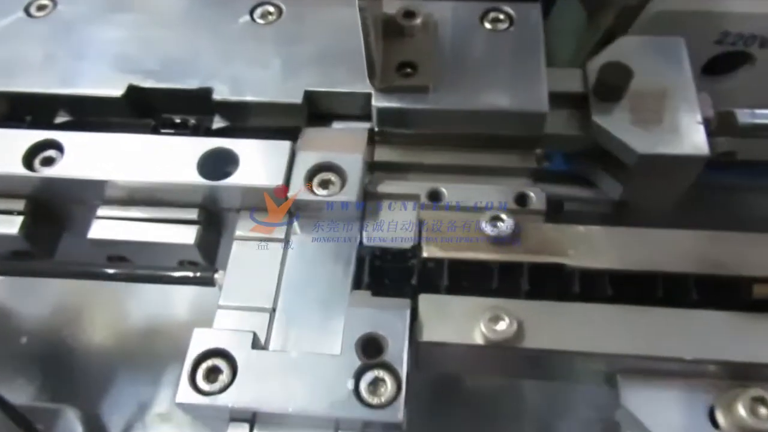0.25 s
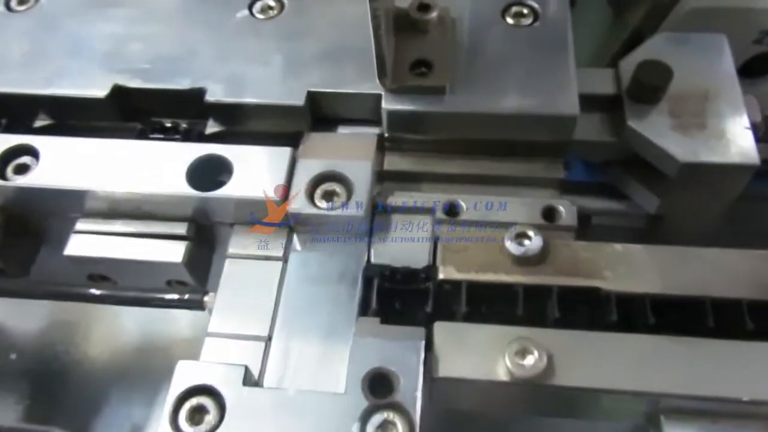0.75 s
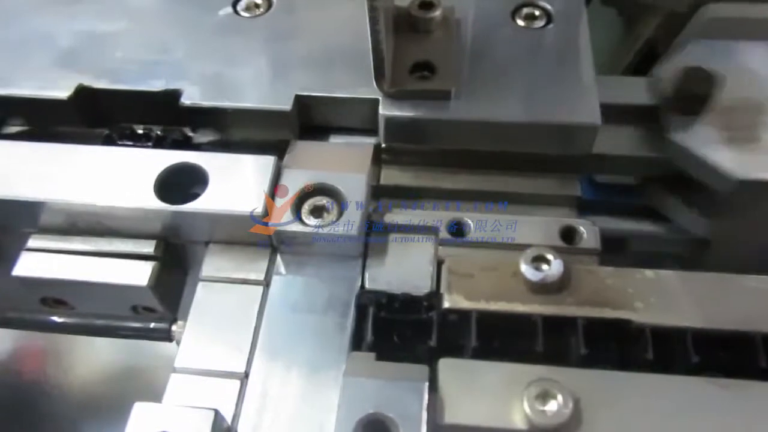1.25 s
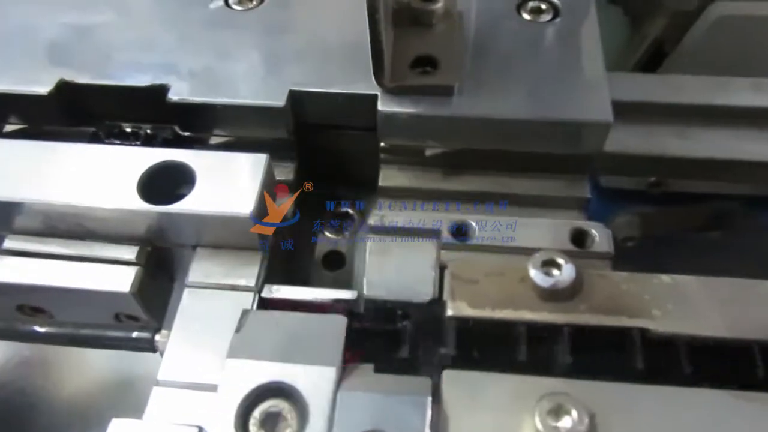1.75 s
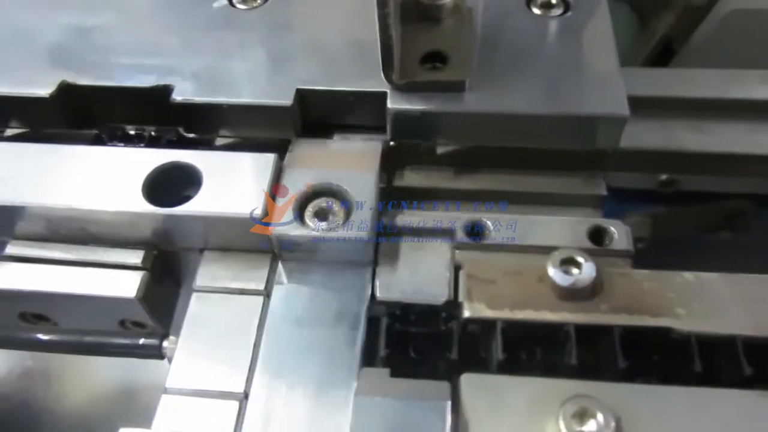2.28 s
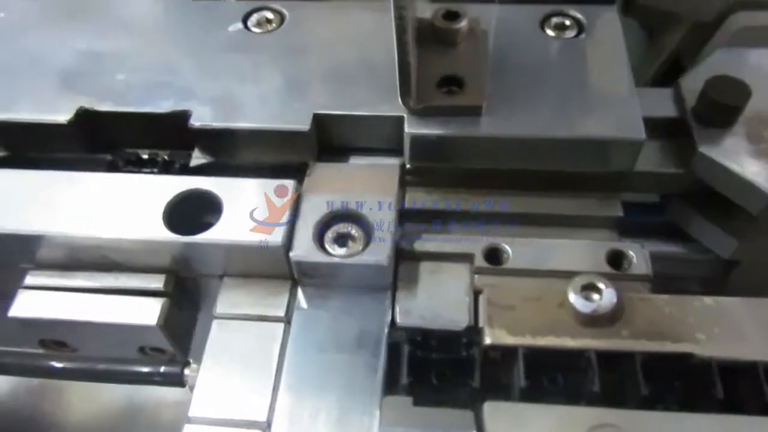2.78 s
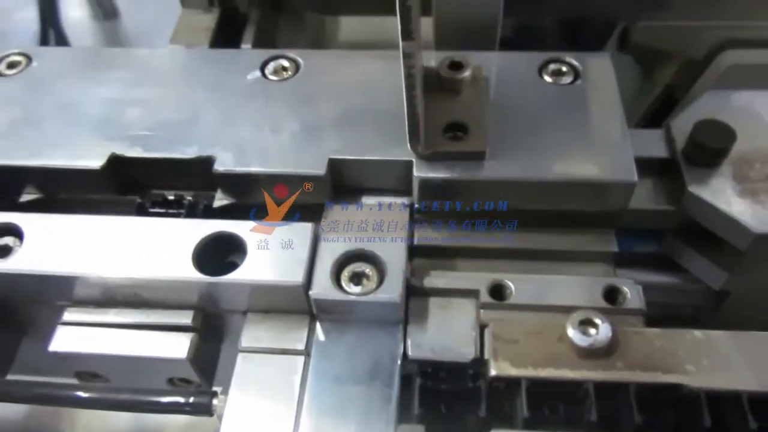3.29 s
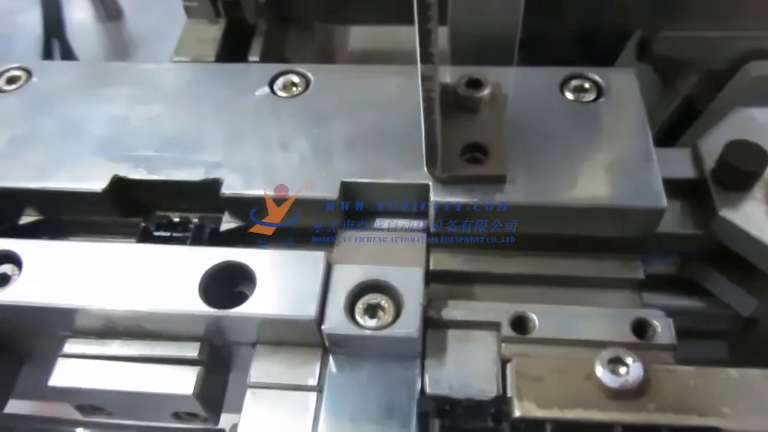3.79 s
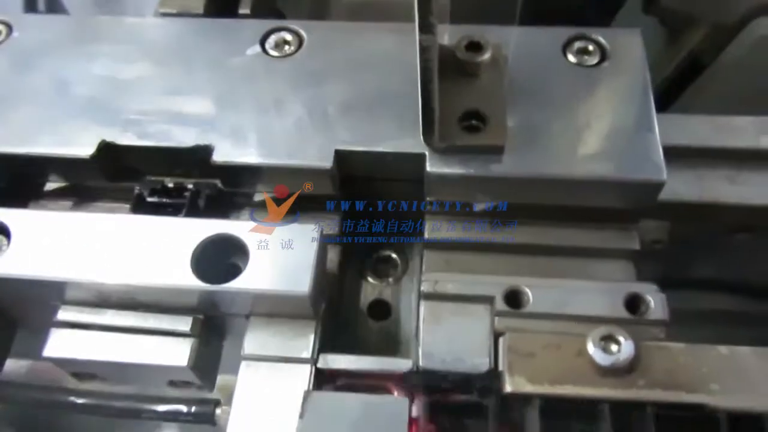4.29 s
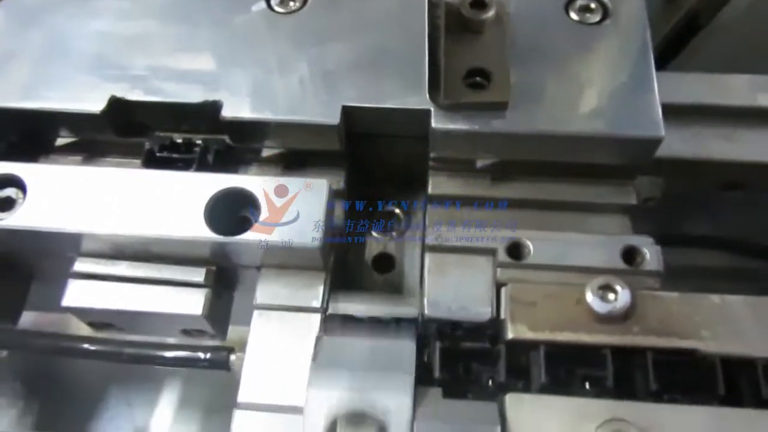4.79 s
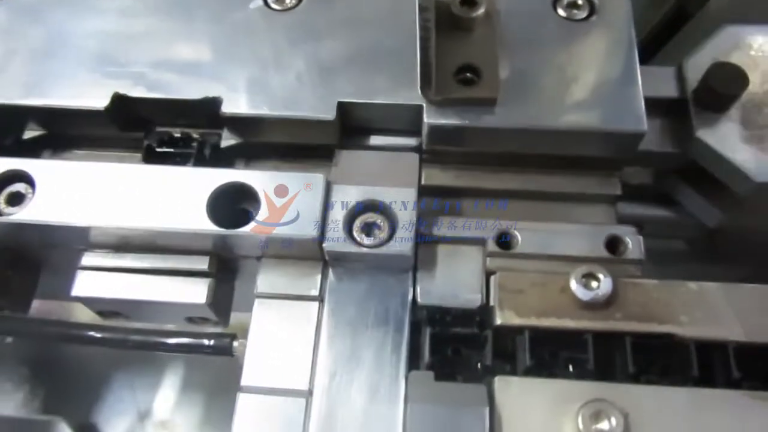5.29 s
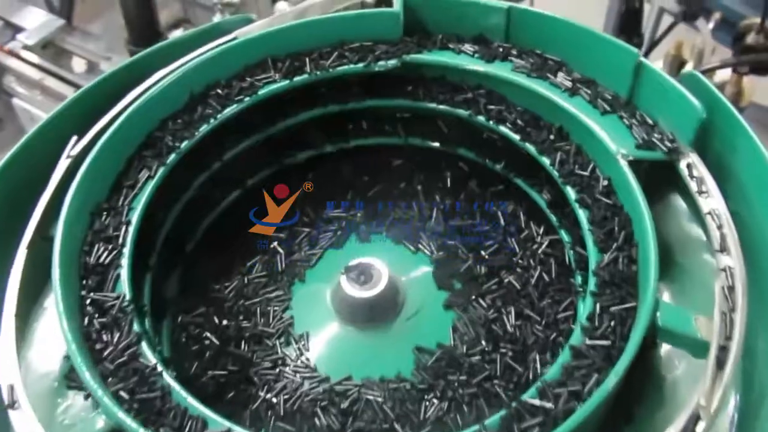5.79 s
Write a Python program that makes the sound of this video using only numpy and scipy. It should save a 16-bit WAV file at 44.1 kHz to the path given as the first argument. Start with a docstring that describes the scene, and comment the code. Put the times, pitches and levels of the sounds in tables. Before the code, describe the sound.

An automatic assembly machine runs close to the microphone in a factory hall. Throughout, small pins shaking in a vibrating feeder make a bright, buzzing sizzle with tiny ticks, over hissing air, electrical hum and the roar of distant machines. Irregular metallic knocks from neighbouring stations fill the first second. At about 1.3 seconds a valve puffs, and at 1.55 a steel slide clacks and bounces against its stop, with further clacks near 1.8 and 2.4. More knocks follow from 2.8 to 3.5. A second puff at 3.9 leads to the hardest clack at 4.15, then others near 4.4 and 5.0. After both main strokes the hiss and roar dip briefly and recover. The hits have a short echo. At about 5.6 seconds the feeder bowl's low drone comes in abruptly over the running machine, with quick knocks until the end at around 6 seconds.

```python
"""A factory hall, microphone close to an automatic assembly machine. Twice, 2.6 s apart, a valve puffs and
a pneumatic steel slide clacks against its stops; hiss, ringing and hall roar dip briefly, then recover.
Nearby stations knock through the frame. A vibrating feeder shakes small pins about a hundred times
a second, a bright buzzing sizzle over leaking air, mains hum and the roar of far machines.
Near the end the sound switches abruptly to the feeder bowl's drone, over the running machine."""
import sys
import numpy as np
from scipy import signal
from scipy.fft import rfft, irfft, next_fast_len
from scipy.io import wavfile
from scipy.ndimage import uniform_filter1d, map_coordinates

SR = 44100
rng = np.random.default_rng(int(sys.argv[2]) if len(sys.argv) > 2 else 0)


def materialize(psi):
    """Save the field psi as 16-bit PCM at rate SR to the path in sys.argv[1].

    A 1-D psi becomes a single channel; in a 2-D psi each row is a channel.
    """
    bounded = np.clip(np.atleast_2d(psi).T, -1, 1)
    quanta = np.round(bounded * 32767).astype(np.int16)
    wavfile.write(sys.argv[1], SR, quanta)


N = 266805
FEEDER_HZ = 103.2
# resonances of the steel feed rails: (frequency [Hz], width [Hz], gain [dB])
RAIL_MODES = [(1263, 59, -6), (1520, 143, -7), (1954, 93, -6), (2450, 70, -1), (3290, 400, -2.5),
              (3497, 170, 1), (3703, 140, 1.5), (4077, 89, 1.5), (4320, 150, -5.5), (4860, 144, -2.5),
              (5330, 160, -5), (5880, 150, -2), (6640, 150, -1.5), (7310, 86, -1.5)]


def amp(db):
    """Decibels to gain."""
    return 10 ** (np.asarray(db) / 20)


def unit(x):
    """Scaled to rms 1."""
    return x / np.sqrt(np.mean(x ** 2) + 1e-20)


def along(points, hz):
    """Read (frequency, value) points on a log axis."""
    freqs, values = np.transpose(points)
    return np.interp(np.log(hz + 1), np.log(freqs + 1), values)


def curves(rows):
    """One value per sample for each column after the time."""
    times, *columns = np.transpose(rows)
    return [np.interp(np.arange(N) / SR, times, column) for column in columns]


def wobble(rate):
    """A smooth random curve, rate knots a second."""
    return map_coordinates(rng.standard_normal(int(N * rate / SR) + 4), [np.arange(N) * rate / SR])


def filtered(x, response):
    """x through a complex response of frequency."""
    n = x.shape[-1]
    padded = next_fast_len(n + SR // 8)
    return irfft(rfft(x, padded) * response(np.fft.rfftfreq(padded, 1 / SR)), padded)[..., :n]


def colour(points):
    """The response of a spectrum given in dB."""
    return lambda hz: amp(along(points, hz))


def body(modes):
    """The response of a set of resonances, alternating in sign."""
    return lambda hz: sum((-1) ** k * amp(db) * 1j * hz * width / (centre**2 - hz**2 + 1j * hz * width)
                          for k, (centre, width, db) in enumerate(modes))


def noise(response, size=N):
    """Two unrelated coloured noises of rms 1."""
    return unit(filtered(rng.standard_normal((2, size)), response))


def add(track, s, sound):
    """Mix a sound in at time s."""
    start = max(round(s * SR), 0)
    track[:, start:start + sound.shape[-1]] += sound[:, :max(N - start, 0)]


def patchy(pair, depth_db):
    """Turbulence: patches of the spectrum swell and fade on their own."""
    spectra = signal.stft(pair, nperseg=512)[2]
    patches = uniform_filter1d(rng.standard_normal(spectra.shape[1:]), size=3, axis=0)
    patches = uniform_filter1d(patches, size=14, axis=1)
    return unit(signal.istft(spectra * amp(depth_db * unit(patches)), nperseg=512)[1][:, :N])


def wandering(pair, spread_hz, rate):
    """The resonances drift up and down together by about spread_hz."""
    turns = np.cumsum(spread_hz * wobble(rate)) / SR
    return np.real(signal.hilbert(pair) * np.exp(2j * np.pi * turns))


def gate(delay_s, attack_s, hold_s, release_s):
    """From 0 to 1 and back at the same point of every cycle."""
    # the slide reaches its first stop: (time [s])
    strokes = [1.5525, 4.151]
    edges = delay_s + np.cumsum([0, attack_s, hold_s, release_s])
    return sum(np.interp(np.arange(N) / SR - s, edges, [0, 1, 1, 0]) for s in strokes)


def dip():
    """1 while hiss, ringing and hall roar dip after each loud clack, back to 0 as they recover."""
    return gate(0, attack_s=.075, hold_s=.19, release_s=.28)


def bowl_switch(switch_s=5.6, crossfade_s=.07):
    """From 0 to 1 as the sound switches abruptly to the feeder bowl's drone."""
    return np.clip((np.arange(N) / SR - switch_s) / crossfade_s + .5, 0, 1)


def hall(flutter_db=2, swell_db=2, dip_db=-2.5, bowl_db=3.5):
    """Far off, many machines merge into a restless roar over a low rumble."""
    # spectra of roar and rumble: (frequency [Hz], density [dB])
    roar_spectrum = [(200, -29), (400, -6.5), (600, 1), (720, 1.5), (1000, 1), (1600, -2), (2200, -0.5),
                     (3200, -4), (6000, -36)]
    rumble_spectrum = [(20, -48), (60, -44), (85, -13), (125, -3), (150, -1), (205, 3.5), (250, 4),
                       (350, 3.5), (450, -6.5), (700, -42)]
    # their slow rise and fall: (time [s], relative level [dB])
    roar_levels = [(0, -30), (.8, -28.5), (2.3, -30), (2.8, -31.5), (3.9, -30), (4.7, -33.5), (6.05, -32.5)]
    rumble_levels = [(0, -47), (1.05, -48), (1.7, -41), (2.1, -48.5), (3.3, -48.5), (4.1, -45.5),
                     (4.9, -50.5), (6.05, -47.5)]
    roar_db = curves(roar_levels)[0] - 1 + dip_db * dip() + bowl_db * bowl_switch()
    roar = amp(roar_db + flutter_db * wobble(35)) * noise(colour(roar_spectrum))
    rumble = amp(curves(rumble_levels)[0] + swell_db * wobble(6.13)) * noise(colour(rumble_spectrum))
    return roar + rumble


def hum(mains_hz=100, coil_db=-64, waver_db=2):
    """Mains hum swells and beats with the feeder's coil, among slightly unsteady motors."""
    # swells of the mains hum: (time [s], relative level [dB])
    mains_levels = [(0.0, -62), (0.22, -46.5), (0.76, -69), (0.81, -52), (1.15, -51), (1.51, -68),
                    (1.68, -54.5), (3.31, -55.5), (3.37, -71), (3.55, -52), (3.93, -52), (4.15, -68),
                    (4.37, -55), (4.48, -59), (5.1, -53), (5.13, -69), (5.33, -49), (5.6, -64)]
    # motor tones: (frequency [Hz], rms level [dB], drift [Hz])
    motor_tones = [(85.6, -67, 1), (121, -64, 2.95), (199.6, -56, 2.3), (216.8, -53.5, 4.2),
                   (512, -54.5, 2.33), (601, -53.5, 5.66), (1028, -54.5, 6)]
    tone = lambda hz: np.sin(2 * np.pi * np.cumsum(hz) / SR)
    mains = amp(curves(mains_levels)[0] - 1) * tone(mains_hz + .5 * wobble(3.6))
    coil = amp(coil_db) * tone(np.full(N, FEEDER_HZ))
    motors = sum(amp(db + waver_db * wobble(5.08)) * tone(hz + drift * wobble(20))
                 for hz, db, drift in motor_tones)
    return np.sqrt(2) * (mains + coil + motors) * np.array([[1], [0]])  # no diffuse part


def air_leak(level_db=-21, fade_db_per_s=-.45, bowl_db=3, dip_db=-2):
    """Compressed air hisses from a leak all the time; the level dips briefly after each loud clack."""
    # the leak's hiss: (frequency [Hz], density [dB])
    hiss = [(800, -30.5), (2000, -6.5), (3100, -3), (4000, -5), (5500, -8.5), (7000, -1), (9000, 0),
            (11200, 2), (12500, 0), (14000, -2), (15700, -8)]
    leak_db = level_db + fade_db_per_s * np.arange(N) / SR + bowl_db * bowl_switch() + dip_db * dip()
    return amp(leak_db + wobble(4.48)) * patchy(noise(colour(hiss)), depth_db=2)


def air_passages(dip_db=-10):
    """Air rushes through hollow passages; the level dips briefly after each loud clack."""
    # resonances of the passages: (frequency [Hz], width [Hz], gain [dB])
    modes = [(2207, 280, -1.5), (2418, 225, 3), (2544, 324, -1)]
    # strength of the rush: (time [s], level [dB])
    levels = [(0, -34), (.55, -37), (.8, -44), (1.25, -31), (1.5, -43), (1.9, -38), (2.03, -27),
              (2.18, -34.5), (2.3, -28.5), (2.55, -31), (2.8, -29), (3.2, -32.5), (3.5, -36), (4.7, -36.5),
              (5.6, -40), (6.05, -35)]
    return amp(curves(levels)[0] + dip_db * dip()) * noise(body(modes))


def exhaust(cut_hz=3150):
    """Vented air sounds the exhaust port, which radiates little below cut_hz."""
    # resonances of the port: (frequency [Hz], width [Hz], gain [dB])
    modes = [(3790, 550, -9), (4050, 220, -3), (4395, 235, 0), (4660, 280, -1.5), (5270, 390, -0.5),
             (6000, 230, 1), (6190, 450, -2), (6520, 170, -7)]
    # strength of the venting: (time [s], relative level [dB])
    levels = [(0, -28.5), (.5, -27.5), (1.05, -30.5), (1.3, -27.5), (2.2, -29.5), (3.05, -27.5),
              (3.55, -33), (3.78, -27.5), (3.97, -24.5), (4.25, -26), (4.38, -23), (4.68, -22),
              (4.85, -23.5), (5.25, -23), (5.54, -23.5), (5.64, -25.5), (6.05, -28.5)]
    port = lambda hz: body(modes)(hz) / np.sqrt(1 + (cut_hz / (hz + 1)) ** 12)
    return amp(curves(levels)[0] + 1 + wobble(16)) * wandering(noise(port), spread_hz=45, rate=9)


def valve_puffs(jet_db=-26):
    """A valve vents a bright jet of air until the slide has made its stroke."""
    # the jet's spectrum: (frequency [Hz], density [dB])
    jet = [(1000, -21), (3000, -10), (4200, -5), (6000, 6), (7500, 3), (10000, 3), (13000, 5), (15700, -2)]
    opening = gate(delay_s=-.222, attack_s=.03, hold_s=.216, release_s=.04)
    return amp(jet_db) * opening * noise(colour(jet))


def bowl(faint_db=-66, loud_db=-38):
    """The feeder bowl and its stand drone, faint at first; near the end the sound switches abruptly to this
    drone."""
    # resonances of shell and stand: (frequency [Hz], width [Hz], gain [dB])
    modes = [(86.5, 11, -4.5), (121, 11, -9), (212.4, 13, 0.5), (300, 22, -6), (367, 31, -1), (427, 34, -1),
             (480, 38, -2), (910, 93, -29), (1560, 120, -8), (1930, 70, -7), (2900, 160, -11)]
    level_db = faint_db + (loud_db - faint_db) * bowl_switch()
    return amp(level_db) * noise(lambda hz: body(modes)(hz) * (hz > 70))


def rails(chatter_db=-26, dip_db=-5, jostle_db=1.16, grain_db=2):
    """Jostling pins keep the steel rails ringing; the level dips briefly after each loud clack."""
    contacts = rng.standard_normal((2, N)) * amp(jostle_db * wobble(30) + grain_db * wobble(500))
    return amp(chatter_db + dip_db * dip()) * unit(filtered(contacts, body(RAIL_MODES)))


def pin_ticks(level_db=-8, t60=.018, impact_db=4, impact_s=.0015):
    """Single pins strike the rails with a hard first instant; the ring dies at once."""
    # pin strikes: (time [s], relative level [dB])
    strikes = [(0.231, -4), (.484, -11), (0.797, -5), (.829, -3), (2.744, -8), (2.796, -4), (3.372, -4),
               (3.399, -6), (4.319, -9), (4.499, -4), (4.603, -7), (5.043, -1), (5.256, -9), (5.421, -3)]
    out, t = np.zeros((2, N)), np.arange(SR // 10) / SR
    fade_db = impact_db * np.exp(-(t / impact_s) ** 2) - 60 * t / t60
    for s, db in strikes:
        add(out, s, amp(level_db + db + fade_db) * noise(body(RAIL_MODES), size=len(t)))
    return out


def feeder(loose_db=2, spray_db=-7, throw_db=3, rebound_db=.6, track_share=.8, bowl_share=.44):
    """Pins land once per shake of the feeder and ring its track; those in the bowl rattle freely."""
    # the whole sizzle: (time [s], level [dB])
    levels = [(0, -19.5), (.45, -21), (.8, -22.5), (1.15, -21.5), (1.4, -20.5), (1.7, -23), (2.05, -21.5),
              (2.6, -24), (3.5, -24.5), (4.03, -21.5), (4.3, -23.5), (4.7, -22), (5.4, -25.5),
              (6.05, -25.5)]
    # the track's two rings within it: (time [s], lower ring [dB], upper ring [dB])
    ring_levels = [(0, -16, -0.5), (.5, -9, 1), (1.1, -4.5, 3.5), (1.35, -5, 1), (1.9, -5, -0.5),
                   (2.45, -4, 2), (2.7, -5, 2), (3.55, -6, 3), (3.98, -9, 2.5), (4.35, -6, -2.5),
                   (4.7, -5, -.5), (5.45, -8, 2.5), (5.65, -12, 3), (6.05, -18, 2)]
    # resonances of the track: (frequency [Hz], width [Hz], gain [dB])
    lower_modes = [(10430, 140, 0), (11140, 430, -10)]
    upper_modes = [(12860, 310, 1), (13470, 560, -7.5)]
    # clashing pins: (frequency [Hz], density [dB])
    pins = [(3000, -29), (7000, 1), (9800, -5), (11500, 3.5), (12400, 2), (13700, 9), (14700, -4),
            (15700, -5)]
    phase = 2 * np.pi * FEEDER_HZ * np.arange(N) / SR
    level_db = curves(levels)[0] + .5 * wobble(7.5) + dip()  # 1 dB up while the hiss dips
    landings = unit(amp(throw_db * np.cos(phase) + rebound_db * np.cos(2 * phase) + wobble(300)))
    lower_db, upper_db = curves(ring_levels)
    lower = amp(lower_db) * noise(body(lower_modes))
    upper = patchy(noise(body(upper_modes)), depth_db=1.4)
    upper = amp(upper_db) * wandering(upper, spread_hz=43, rate=12)
    track = landings * (lower + upper + amp(spray_db) * noise(colour(pins)))
    loose = amp(loose_db) * unit(amp(5.2 * wobble(900))) * noise(colour(pins))
    share = track_share + (bowl_share - track_share) * bowl_switch()  # less track after the switch
    return amp(level_db) * (np.sqrt(share) * track + np.sqrt(1 - share) * loose)


def knock(db, hz, boom_db, thud_t60=.087, part_t60=.062, rattle_t60=.073, split_hz=70, width_hz=260):
    """A blow thuds, rings and rattles the loose struck part and booms in the frame that carries it."""
    # modes of the frame: (frequency [Hz], gain [dB], t60 [s])
    frame_modes = [(446, -11, 0.11), (596, 1.5, 0.15), (670, -5, 0.11), (775, -8, 0.15)]
    # the blow's thud: (frequency [Hz], density [dB])
    thud_spectrum = [(30, -55), (100, -25), (350, -10), (600, -1.5), (850, -1.5), (1500, 1), (2200, -6),
                     (8000, -24)]
    t = np.arange(SR // 4) / SR

    def mode(freq):
        """A sine, slightly detuned from blow to blow."""
        return np.sin(2 * np.pi * (freq * (1 + .01 * rng.standard_normal()) * t + rng.random((2, 1))))

    frame = sum(amp(-6.5 + boom_db + gain - 60 * t / t60) * mode(f) for f, gain, t60 in frame_modes)
    thud = amp(-8 + .25 * boom_db - 60 * t / thud_t60) * noise(colour(thud_spectrum), size=len(t))
    part = amp(-9 - 60 * t / part_t60) * (mode(hz) + amp(-7) * mode(hz + split_hz))
    rattle = amp(-12 - 60 * t / rattle_t60) * noise(body([(hz, width_hz, 0)]), size=len(t))
    return (frame + thud + part + rattle) * amp(db) * (1 - np.exp(-t / .0015))


def clack(db, bright_db, t60, ring_db=-13, crack_db=-7, impact_db=4.5, impact_s=.0046):
    """Steel on steel: a hard first instant, then a crack and the short, damped ring of the slide."""
    # resonances of the steel slide: (frequency [Hz], width [Hz], gain [dB])
    modes = [(840, 250, -10), (1140, 230, -3.5), (1390, 120, -5), (1660, 310, -2), (2270, 250, 2),
             (2670, 420, -3.5), (3220, 190, -1), (3760, 260, -1), (4270, 400, -6.5), (6140, 200, -6)]
    # the contact's crack: (frequency [Hz], density [dB])
    crack_spectrum = [(300, -37), (1000, -13), (2500, 2.5), (4200, -0.5), (6000, 4), (7500, -2), (11000, 5),
                      (14000, -15)]
    t = np.arange(SR // 5) / SR
    # a light, glancing contact is bright and hardly sets the heavy slide ringing
    ring = amp(ring_db - .46 * bright_db) * noise(body(modes), size=len(t))
    crack = amp(crack_db + bright_db) * noise(colour(crack_spectrum), size=len(t))
    fade_db = impact_db * np.exp(-(t / impact_s) ** 2) - 60 * t / t60
    return (ring + crack) * amp(db + fade_db) * (1 - np.exp(-t / .000094))


def stations():
    """The neighbouring stations knock through their steps, each knock with a steel edge; the knocks at 1.453 s
    and 4.054 s, just before each stroke, are the slide's lock pin releasing."""
    # their blows: (time [s], knock level [dB], ring of the part [Hz], frame boom [dB], clack level [dB])
    blows = [(.135, -8.5, 1427, -26, -16), (.23, -15, 1480, -24, -14), (.374, -14, 1040, -8, -17),
             (.487, -21, 796, -5, -19), (.596, -10, 1030, -9, -13), (.707, -15, 770, -10, -15),
             (.895, -14.5, 1500, -19, -24), (1.14, -18, 934, -26, -14), (1.453, -18, 1020, -20, -20),
             (2.406, -14, 1170, -16, -18), (2.795, -19, 964, -21, -24), (2.947, -12, 986, -8, -17),
             (2.985, -16.5, 786, -10, -26), (3.064, -20, 800, -10, -14), (3.166, -14.5, 1043, -3, -10),
             (3.276, -13, 790, -17, -19), (3.401, -18, 1350, -20, -15), (3.461, -15.5, 1010, -16, -28),
             (4.054, -15.5, 1020, -12, -15), (5.401, -17, 1100, -11, -11), (5.412, -17, 1420, -14, -13),
             (5.552, -14, 1633, -9, -14), (5.665, -10, 897, -14, -14), (5.68, -16, 640, -12, -20),
             (5.716, -12, 768, -14, -25), (5.735, -19, 994, -14, -29), (5.79, -17, 955, -20, -25),
             (5.883, -12, 877, -12, -12), (5.993, -8.5, 832, -20, -22)]
    out = np.zeros((2, N))
    for s, db, hz, boom_db, steel_db in blows:
        add(out, s, knock(db, hz, boom_db))
        add(out, s, clack(steel_db, bright_db=-9, t60=.047))
    return out


def slide():
    """Close to the microphone the slide bounces on its stops and shakes the frame."""
    # hits and bounces: (time [s], level [dB], brightness [dB], t60 [s])
    stops = [(1.5532, -5.5, -11, 0.045), (1.562, -8, -13, 0.04), (1.573, -6, -4, .035),
             (1.582, -11.5, -5, 0.056), (1.8437, -7, -7, 0.027), (2.3758, -10, 2, .012),
             (2.4355, -9, 2.5, .022), (2.443, -15, -2, .04), (4.151, 0, -8, 0.022), (4.1602, -8, -2, .035),
             (4.171, -7, -1, 0.054), (4.4414, -8.5, -3, 0.034), (5.036, -11.5, 2, 0.045)]
    # jolts of its guide: (time [s], level [dB], ring of the part [Hz], frame boom [dB])
    jolts = [(1.575, -12.5, 1180, -19), (1.586, -14.5, 850, -17), (1.844, -11.5, 1960, -36),
             (2.44, -24, 1100, -2), (4.178, -15.5, 1070, -23), (4.455, -14.5, 1457, -14),
             (5.039, -22, 1060, -3)]
    out = np.zeros((2, N))
    for s, db, bright_db, t60 in stops:
        add(out, s, clack(db, bright_db, t60))
    for s, db, hz, boom_db in jolts:
        add(out, s, knock(db, hz, boom_db))
    return out


def hall_echo(x, spans=20):
    """The hall's echo, a little different from moment to moment; high frequencies die first."""
    # decay of the hall: (frequency [Hz], t60 [s])
    decay = [(200, 0.57), (2000, 0.3), (10000, 0.042)]
    out = np.zeros((2, N))
    for span in np.array_split(np.arange(N), spans):
        hz, t, spectra = signal.stft(rng.standard_normal((2, SR // 2)), SR, nperseg=256)
        tail = signal.istft(spectra * amp(-60 * t / along(decay, hz)[:, None]), SR, nperseg=256)[1]
        add(out, span[0] / SR, signal.fftconvolve(x[:, span], tail / np.linalg.norm(tail[0]), axes=1))
    return out


def microphone(pair):
    """Two close ports share the bass; the treble is more diffuse and reaches the right one first."""
    # width of the sound field: (frequency [Hz], diffuse over common [dB])
    width = [(30, -15), (80, -25), (200, -35), (600, -27), (1300, -20), (2400, -16.5), (3200, -12),
             (4400, -5.5), (5300, -4.5), (6600, -2), (9000, -3.7), (10500, -5), (12000, -5.3),
             (13000, -7.5)]
    # balance of the ports: (frequency [Hz], left over right [dB])
    balance = [(3000, .1), (4500, 1), (6200, .8), (7500, -.5), (10400, 0), (13000, -1), (14500, -.2)]
    # phase between the ports: (frequency [Hz], lead of the left [rad])
    lead = [(3200, 0), (4300, -.3), (5800, -1), (6600, -1.8), (9000, -2.4), (13000, -2.45), (15500, -3)]
    angle = lambda hz: np.arctan(amp(along(width, hz)))
    common, diffuse = filtered(pair, lambda hz: np.array([np.cos(angle(hz)), np.sin(angle(hz))]))
    half = np.array([[.5], [-.5]])
    ports = lambda hz: amp(half * along(balance, hz)) * np.exp(1j * half * along(lead, hz))
    return filtered(np.array([common + diffuse, common - diffuse]), ports)


def scene(echo_db=-7):
    """Blows and their echo over the running machine."""
    blows = slide() + stations() + pin_ticks()
    background = hall() + hum()
    air = air_leak() + air_passages() + exhaust() + valve_puffs()
    feed = rails() + feeder() + bowl()
    return microphone(blows + amp(echo_db) * hall_echo(blows) + background + air + feed)


def record(dry, ceiling=.9, top_hz=15750):
    """The recorder rounds off the highest peaks and keeps nothing above its band limit."""
    rounded = dry / (1 + np.abs(dry / ceiling) ** 6) ** (1 / 6)
    return filtered(rounded, lambda hz: hz < top_hz)


dry = scene()
out = record(dry)
materialize(out)
```